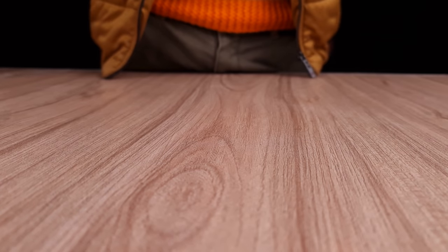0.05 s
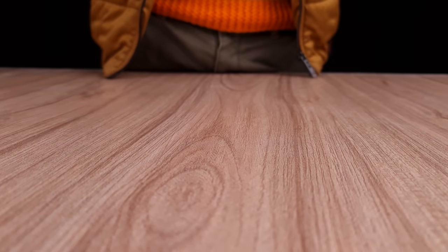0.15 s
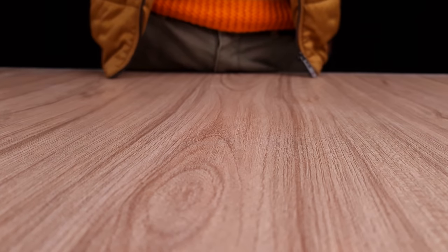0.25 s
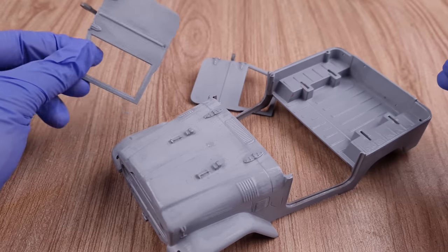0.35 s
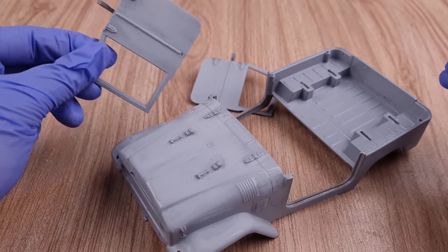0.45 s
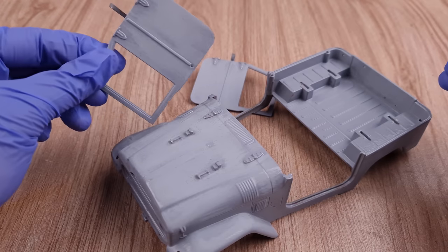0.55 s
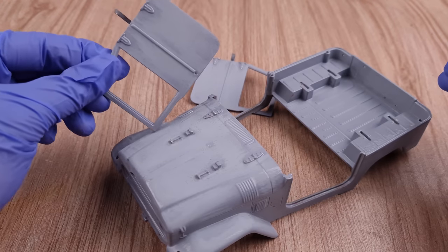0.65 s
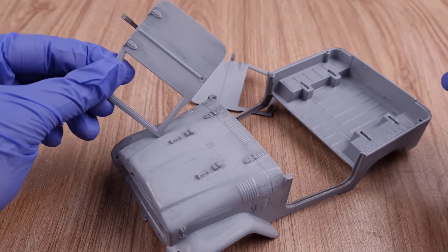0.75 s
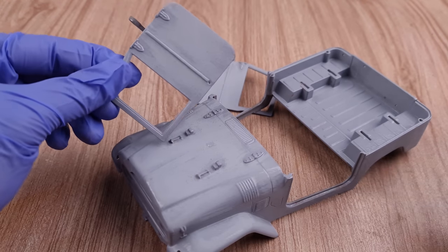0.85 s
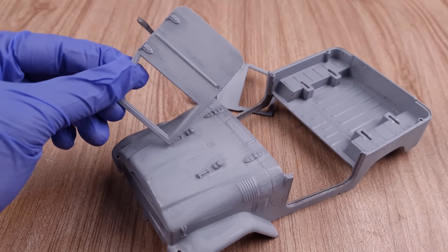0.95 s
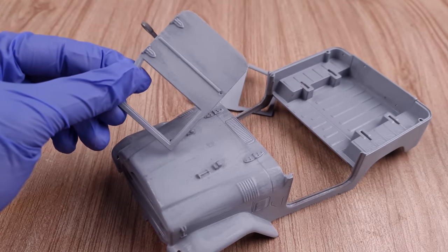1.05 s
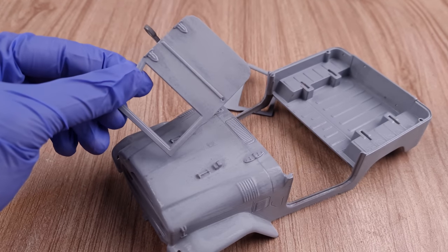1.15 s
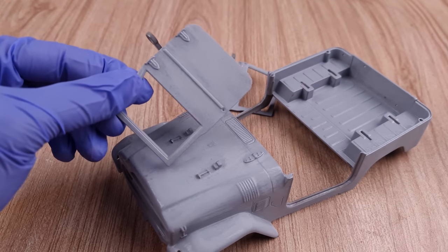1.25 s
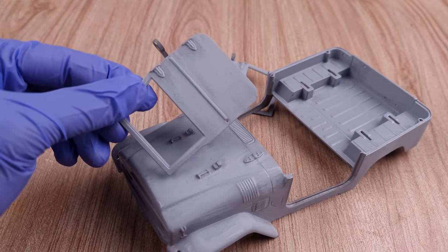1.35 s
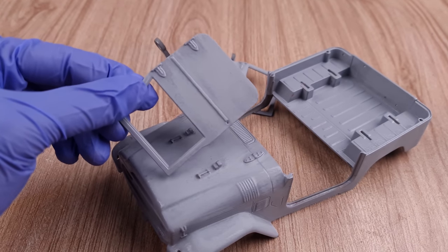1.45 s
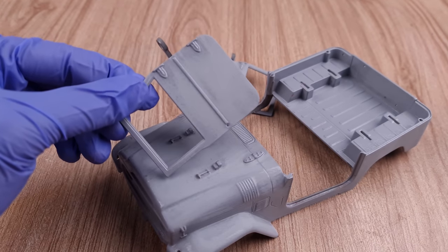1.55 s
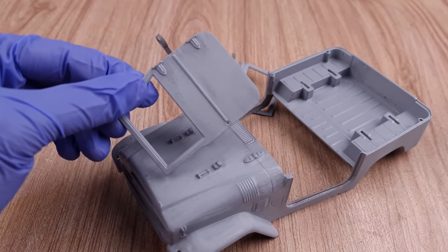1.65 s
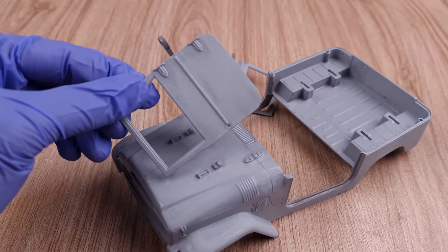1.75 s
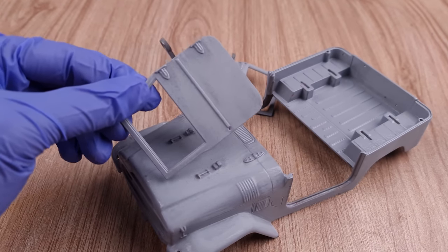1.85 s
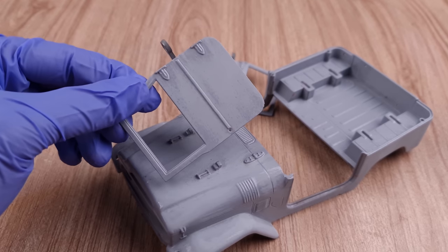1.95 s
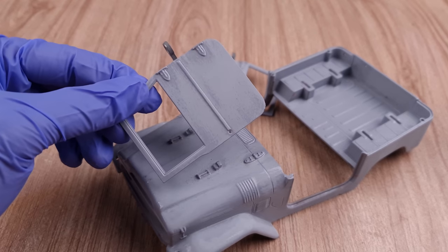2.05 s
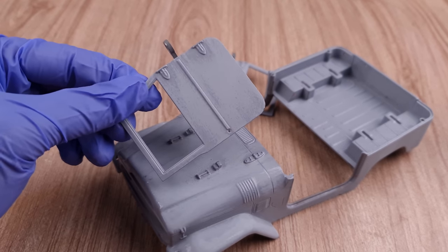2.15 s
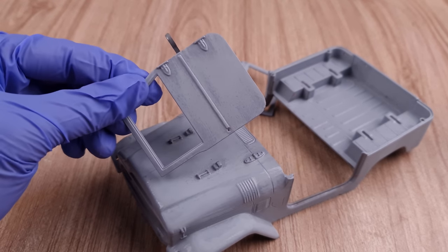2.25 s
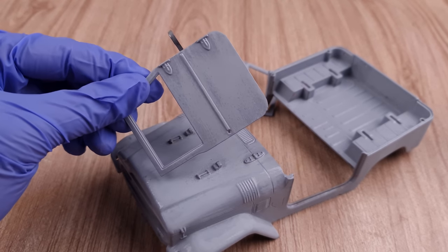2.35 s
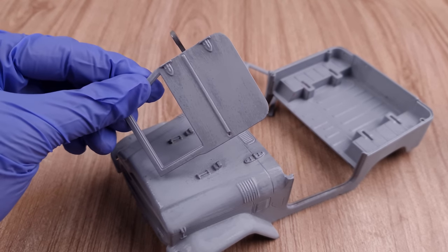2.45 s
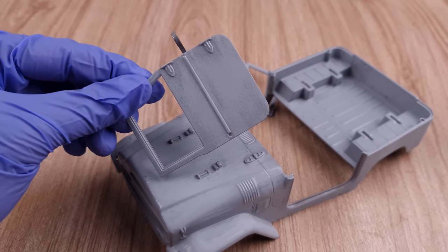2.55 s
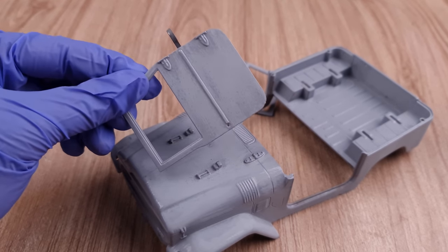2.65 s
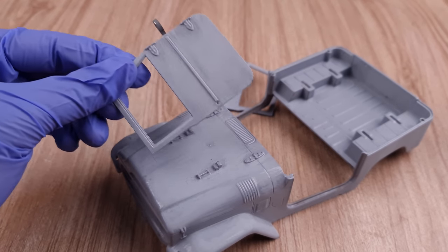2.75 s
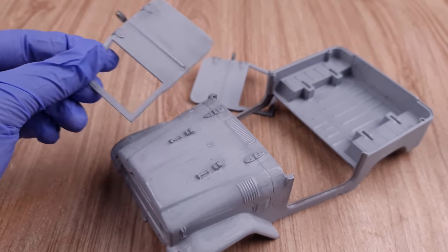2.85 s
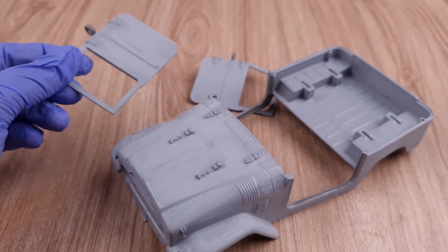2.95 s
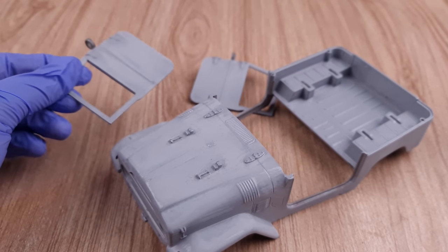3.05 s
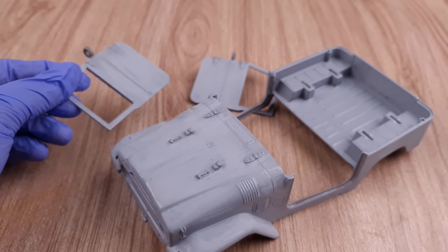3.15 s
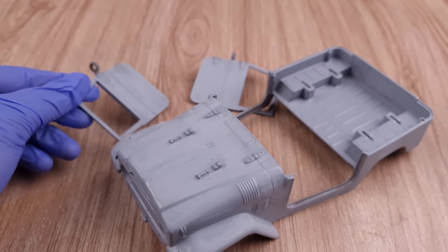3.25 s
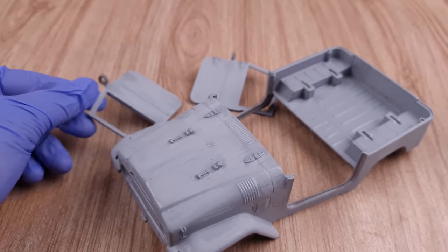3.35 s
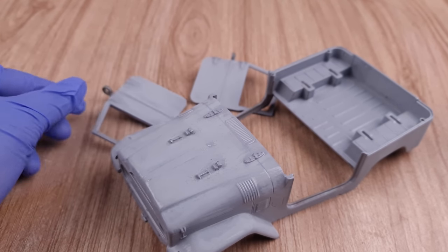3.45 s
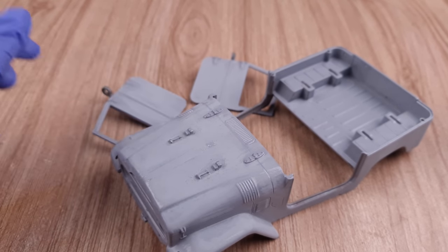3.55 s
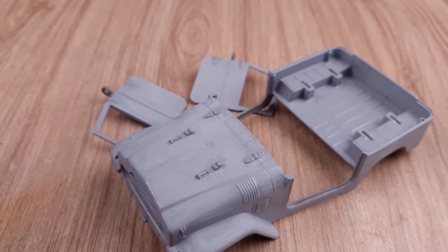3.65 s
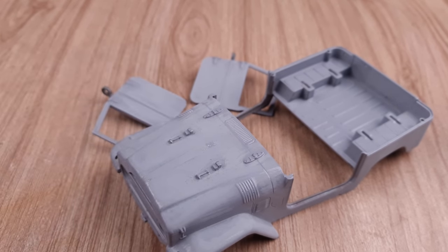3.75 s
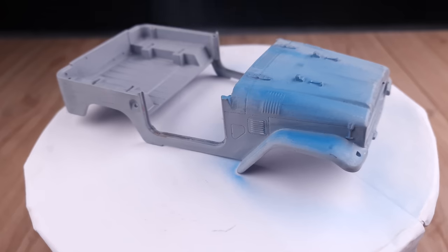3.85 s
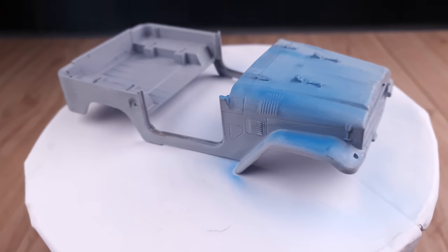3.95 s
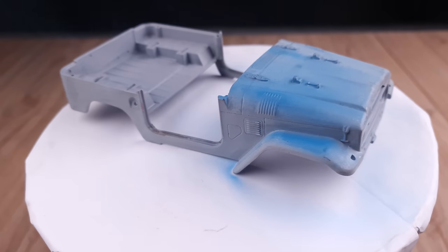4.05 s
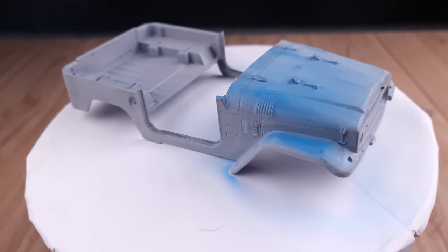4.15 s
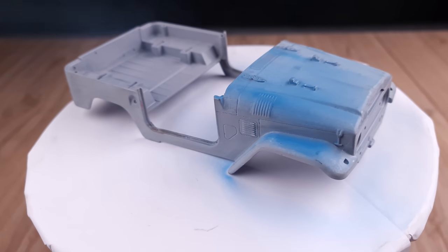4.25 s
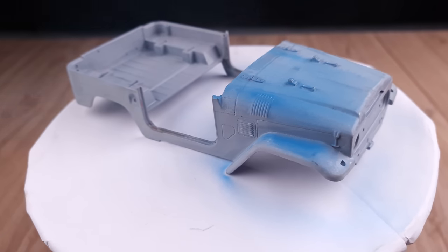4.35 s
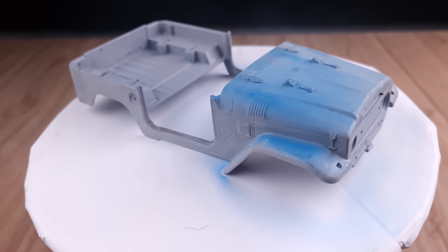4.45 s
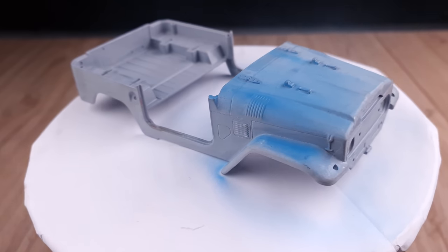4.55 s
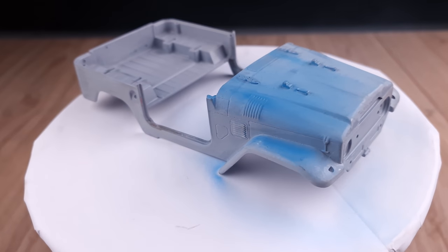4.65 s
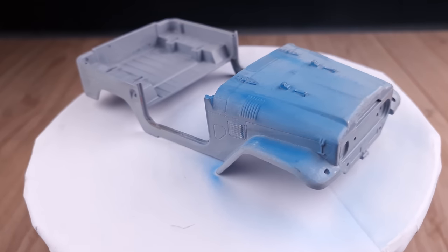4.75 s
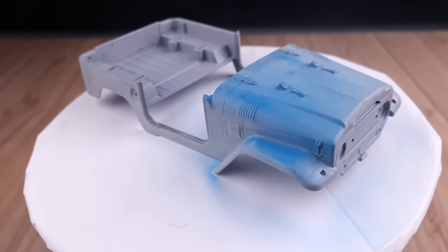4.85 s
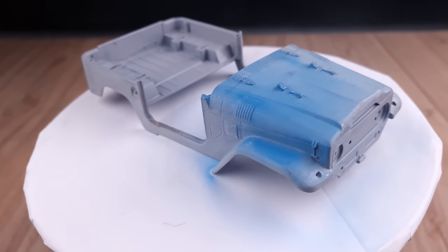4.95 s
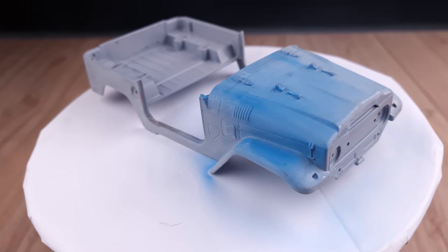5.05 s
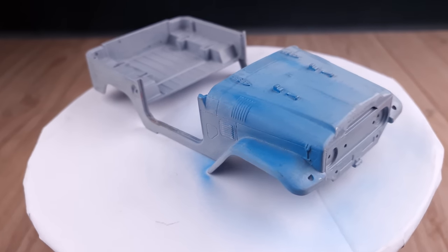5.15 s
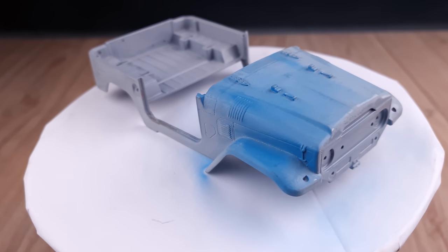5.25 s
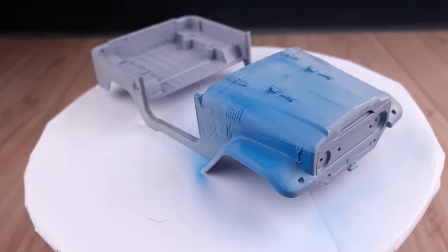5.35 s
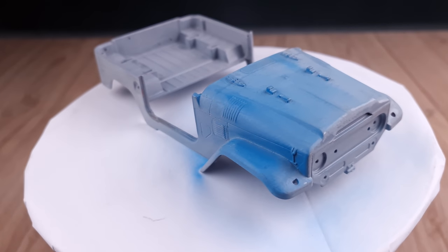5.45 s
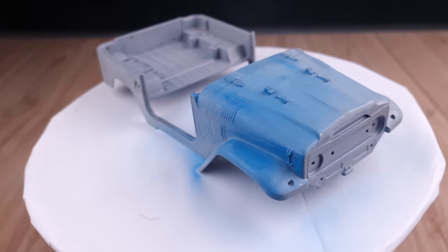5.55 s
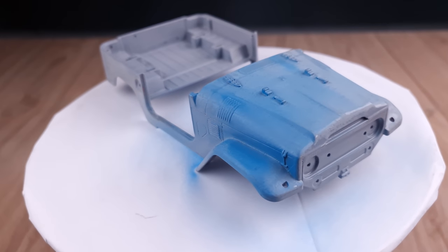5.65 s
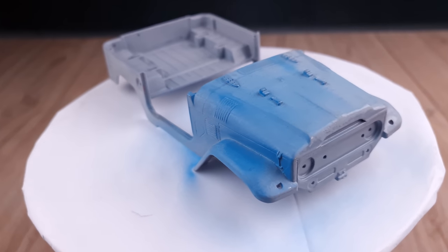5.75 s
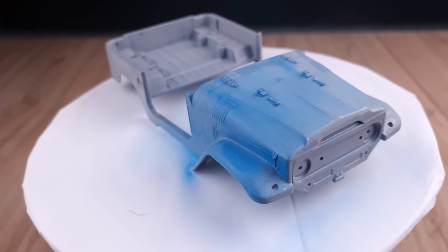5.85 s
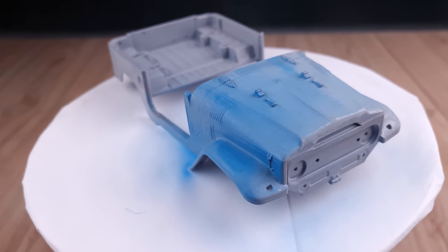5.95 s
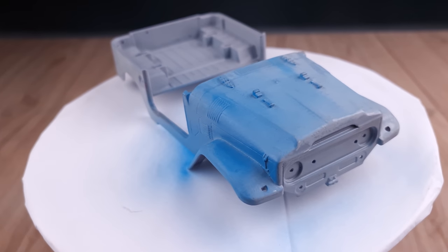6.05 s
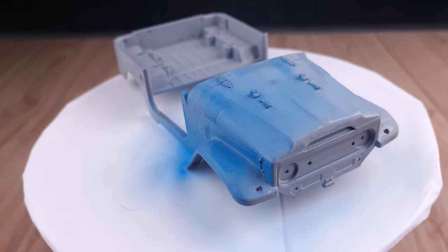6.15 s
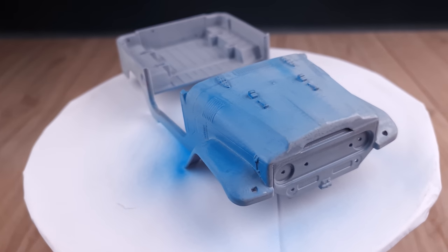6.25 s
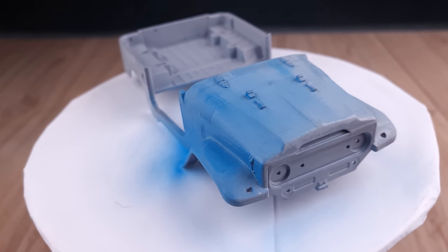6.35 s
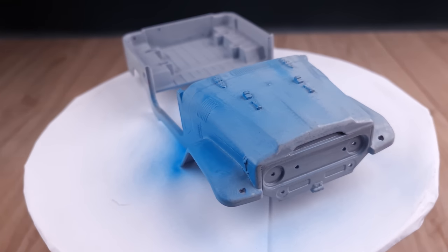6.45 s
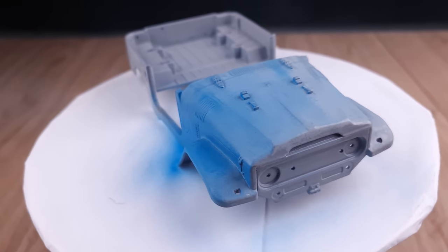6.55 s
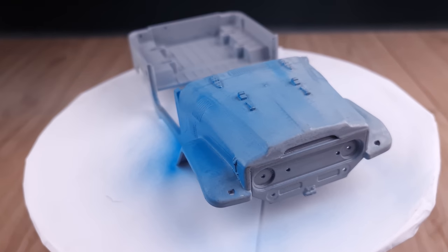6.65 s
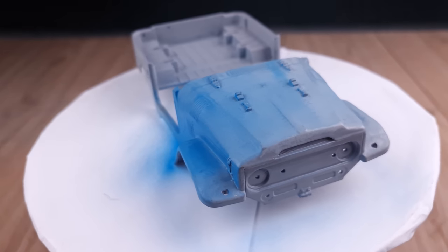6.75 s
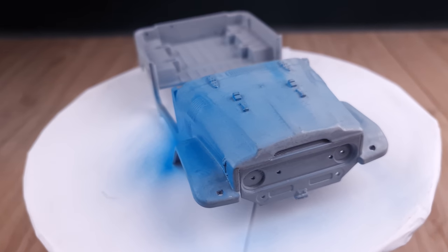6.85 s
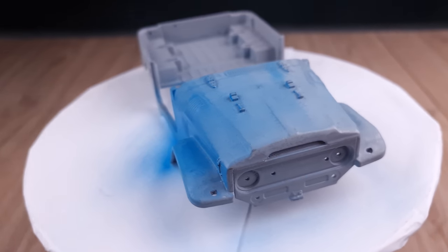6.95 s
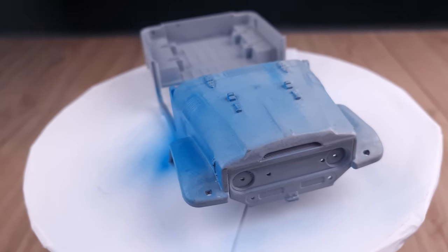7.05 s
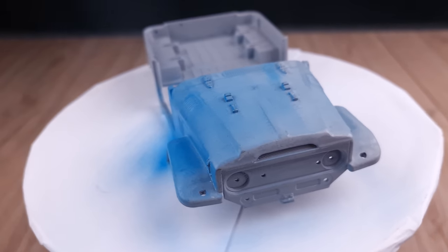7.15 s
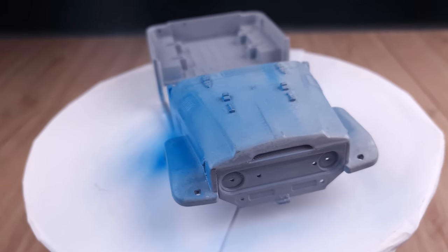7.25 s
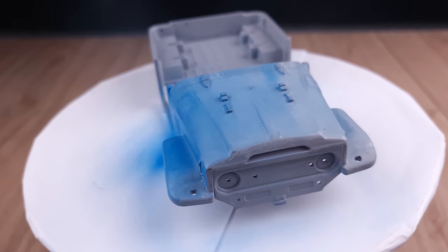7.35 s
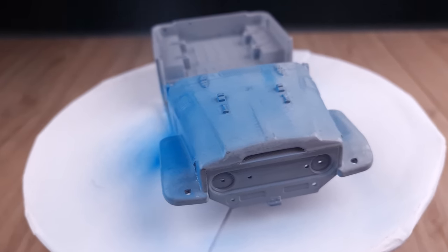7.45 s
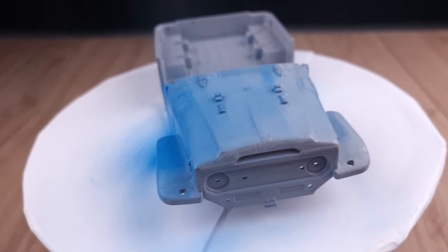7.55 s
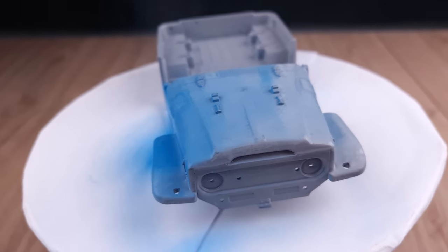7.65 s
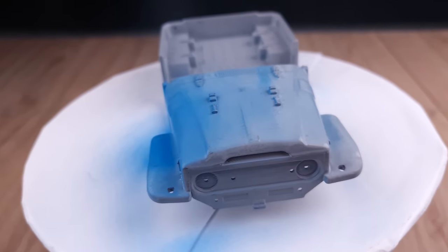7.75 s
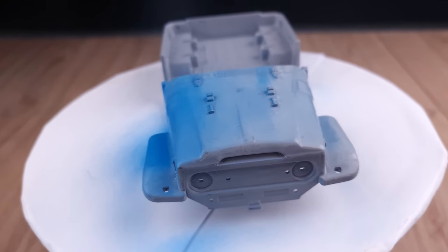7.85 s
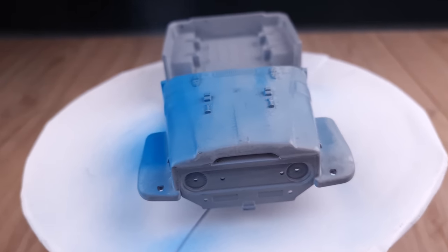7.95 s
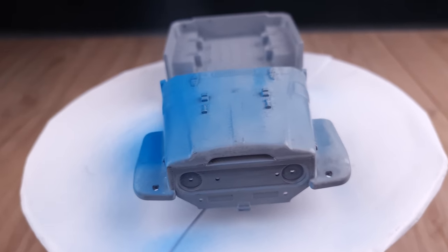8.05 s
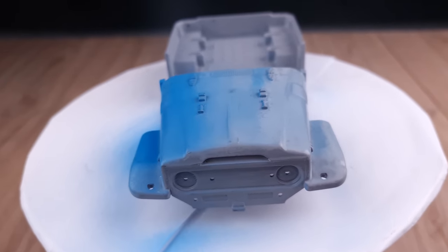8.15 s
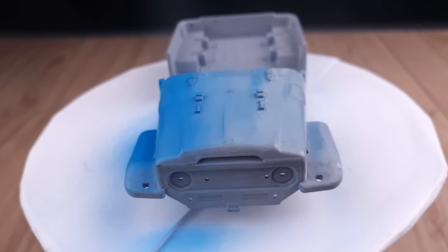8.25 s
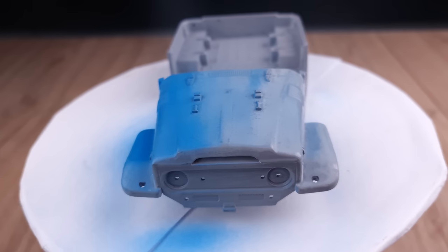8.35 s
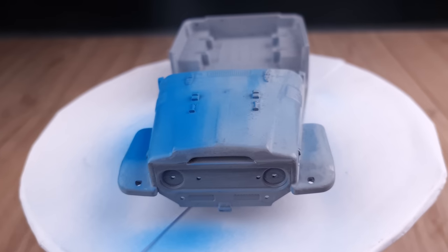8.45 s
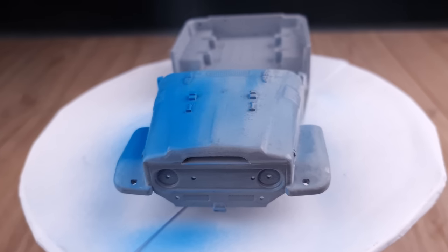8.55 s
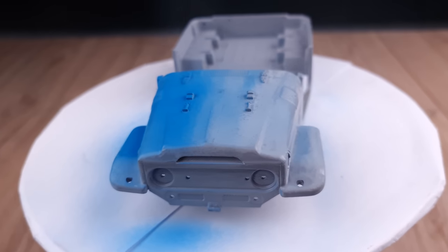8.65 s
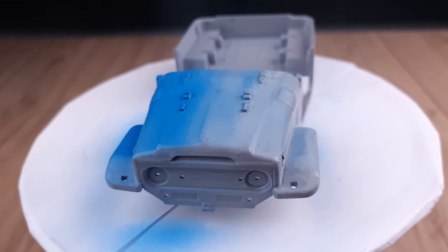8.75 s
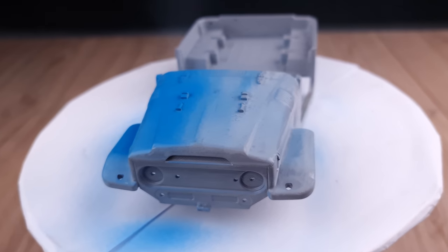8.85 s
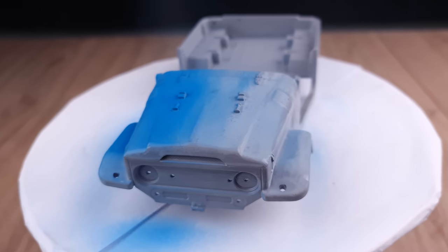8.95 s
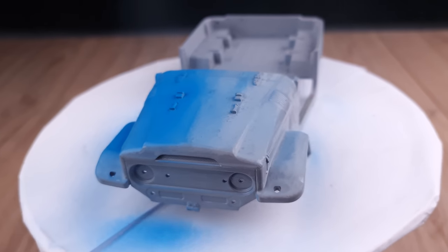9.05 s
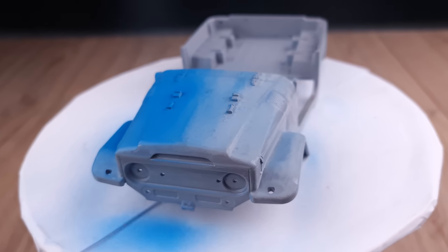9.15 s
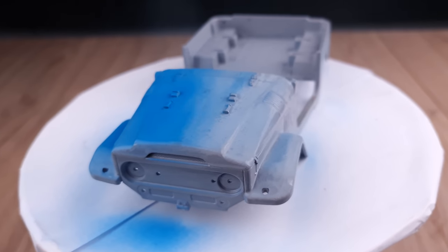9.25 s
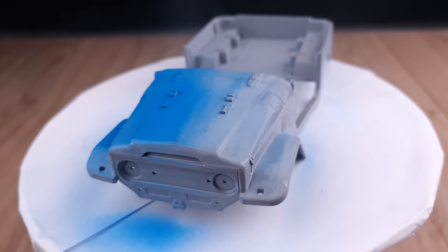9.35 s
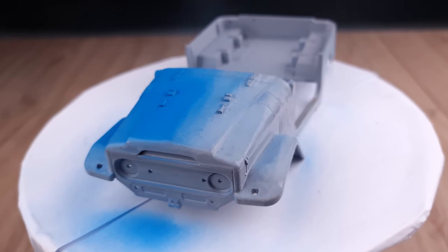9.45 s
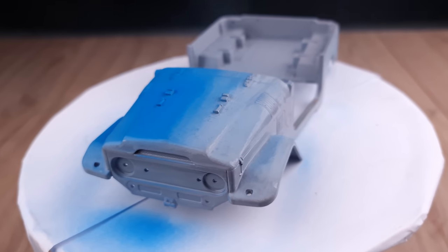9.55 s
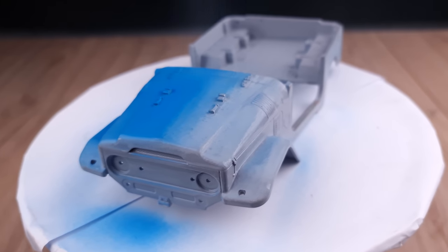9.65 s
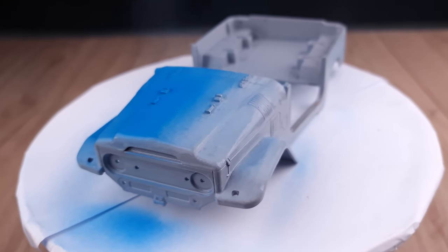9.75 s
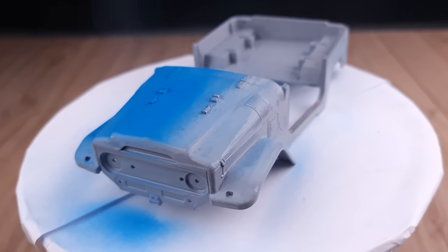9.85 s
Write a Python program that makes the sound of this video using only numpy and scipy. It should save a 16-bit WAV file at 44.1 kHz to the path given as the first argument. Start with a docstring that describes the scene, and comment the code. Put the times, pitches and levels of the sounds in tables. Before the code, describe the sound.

Very close to a wooden workbench, a heap of hard plastic parts scrapes and rattles, then cuts abruptly to near-quiet handling: a sharp double click, soft glove rubs, faint tinks and bumps. A plastic panel drops, slaps and chatters, its small steel pins ringing. Another hard cut brings the steady, bright hiss of an airbrush, slightly shifting in tone, lasting to the end.

```python
"""At a wooden workbench, close to the microphone: three shots joined by hard cuts.
A rattling heap of parts is pushed over the table: gritty noise drives narrow resonances. Gloved hands
turn a plastic panel that clicks (noise bursts) and drop it: its steel pins ring (damped sines) and it rattles.
Last an airbrush hisses: coloured noise, combed by the table echo as the hand moves."""
import sys
import numpy as np
from scipy import signal
from scipy.fft import rfft, irfft, next_fast_len
from scipy.io import wavfile
from scipy.ndimage import map_coordinates

SR = 44100
rng = np.random.default_rng(int(sys.argv[2]) if len(sys.argv) > 2 else 0)


def wav_record(signal):
    """Record a signal, one row per channel, as 16-bit PCM in the file named by sys.argv[1]."""
    frames = np.transpose(np.atleast_2d(signal))
    bounded = np.clip(frames, -1, 1)
    # unit amplitude maps onto the largest positive 16-bit level
    quanta = np.round(bounded * 32767).astype(np.int16)
    wavfile.write(sys.argv[1], SR, quanta)


N = 436149

# wooden table, spectrum shape: f/Hz, density/dB
WOOD_SPECTRUM = [(18, -75), (30, -44.5), (43, -16.5), (92, -30), (111, -10.5), (139, 3.5), (204, -5),
                 (500, -26), (650, -64.5), (1100, -120)]
# room hush, also the dull part of the tinks, spectrum shape: f/Hz, density/dB
HUSH_SPECTRUM = [(240, -37.5), (400, -11), (428, -13.5), (734, -9.5), (1120, -3), (1600, -7), (1900, -17),
                 (4000, -26.5), (5200, -65), (8800, -120)]
# deep bumps and air puffs, spectrum shape: f/Hz, density/dB
DEEP_SPECTRUM = [(30, -41), (50, -7.5), (80, 9), (110, -6), (160, -52)]


def amp(db):
    """Gain of a level in dB."""
    return 10 ** (np.asarray(db) / 20)


def unit(x):
    """x scaled to rms 1."""
    return x / np.sqrt(np.mean(x ** 2) + 1e-20)


def along(points, hz):
    """(f/Hz, value) points interpolated on a log frequency axis."""
    f, v = np.transpose(points)
    return np.interp(np.log(hz + 1), np.log(f + 1), v)


def curves(rows):
    """One value per sample for each column after the time."""
    s, *cols = np.transpose(rows)
    return [np.interp(np.arange(N) / SR, s, c) for c in cols]


def wobble(rate_hz, at=np.arange(N)):
    """Smooth random curve, rate_hz knots a second, read at the given samples."""
    knots = rng.standard_normal(int(N * rate_hz / SR) + 4)
    return map_coordinates(knots, [at * rate_hz / SR])


def filtered(x, response):
    """x times a response of frequency."""
    m = next_fast_len(N + SR // 2)
    return irfft(rfft(x, m) * response(np.fft.rfftfreq(m, 1 / SR)), m)[..., :N]


def noise(spectrum, grit_db=0):
    """Coloured noise of rms 1; grit makes single samples stand out as grains."""
    grains = rng.standard_normal(N) * amp(grit_db * rng.exponential(size=N))
    return unit(filtered(grains, lambda hz: amp(along(spectrum, hz))))


def narrow(hz, width_hz, size):
    """Noise ringing in one resonance, rms 1."""
    pole = np.exp(np.pi * (2j * hz - width_hz) / SR)
    return unit(signal.lfilter([1], [1, -pole], rng.standard_normal(size)).real)


def knock(spectrum, t60_s, corner_hz=12000):
    """Spike and fresh dying burst in the colour of a struck body, peak 1; soft contact cuts the treble."""
    n = 8192
    hz, t = np.fft.rfftfreq(n, 1 / SR), np.arange(n) / SR
    gain = amp(along(spectrum, hz)) / (1 + (hz / corner_hz) ** 2)
    # folded cepstrum: minimum phase, so the body answers at once
    cep = irfft(np.log(gain + 1e-6))
    cep[1:n // 2] *= 2
    cep[n // 2 + 1:] = 0
    body = irfft(np.exp(rfft(cep)))
    blow = rng.standard_normal(n) * amp(-60 * t / t60_s) + 5 * (t == 0)
    burst = signal.fftconvolve(blow, body)[:n]
    return burst / np.abs(burst).max()


def ring(modes, spread_db):
    """Damped modes (f/Hz, level/dB, t60/s), each at a new strength and slightly unsteady in phase."""
    t = np.arange(SR // 2) / SR
    total = 0
    for hz, db, t60_s in modes:
        decay = amp(db + rng.normal(0, spread_db) - 60 * t / t60_s)
        drift_rad = np.cumsum(rng.normal(0, 0.027, len(t)))
        total = total + decay * np.sin(2 * np.pi * hz * t + drift_rad)
    return total


def swells(events, rise, fall):
    """Gain of (t/s, peak/dB[, held/s]) events that rise and fall by so many dB a second; powers add."""
    t = np.arange(0, N / SR, .001)
    s, db, *held_s = np.array(events).T[:, :, None]
    since_end_s = np.maximum(t - s - np.abs(sum(held_s)), 0)
    shape_db = rise * np.minimum(t - s, 0) - fall * since_end_s
    return np.interp(np.arange(N) / SR, t, np.sqrt((amp(db + shape_db) ** 2).sum(axis=0)))


def add(track, s, x):
    """Mixes x into the track from time s."""
    track[round(s * SR):][:len(x)] += x


def spray():
    """Jet hiss and its splash arrive straight, off the table, and weakly off everything nearby."""
    # jet: t/s, level/dB
    jet_levels = [(3.85, -28.5), (4.02, -34), (4.18, -37.5), (4.47, -28.5), (4.79, -24.5), (4.97, -28.5),
                  (5.1, -24.5), (5.26, -27), (5.5, -31.5), (5.75, -29.5), (6.41, -29), (6.61, -30.5),
                  (7.06, -29), (7.33, -30), (7.52, -28), (8.05, -30), (8.35, -29), (8.88, -31), (9.6, -29),
                  (9.89, -31.5)]
    # table echo: t/s, mean delay/ms, strength/0-1
    table_echo = [(3.85, .13, 0.6), (4.1, 0.14, 0.4), (4.3, 0.12, 0.4), (4.5, .095, 0.72), (5, 0.09, 0.9),
                  (5.4, 0.092, 0.6), (5.8, 0.092, 0.5), (6.2, 0.095, 0.8), (6.6, .103, 0.6), (7, .112, 0.5),
                  (7.2, 0.14, 0.7), (7.6, .13, 0.6), (8, 0.14, 0.7), (8.4, 0.13, 0.6), (8.8, 0.14, 0.6),
                  (9.2, 0.13, 0.6), (9.6, 0.14, 0.6), (9.89, .13, .45)]
    # echoes off hand, part and stand: base delay/ms, relative strength/0-1
    nearby = [(.33, 0.04), (.5, 0.25), (.72, 0.27), (.9, 0.05), (1.1, 0), (1.3, 0.03), (1.5, 0.07),
              (1.9, 0.13), (2.2, 0.05), (2.5, 0.06), (2.85, 0.14), (3.151, 0.1), (3.8, .05), (4.25, .06)]
    # jet, spectrum shape: f/Hz, density/dB
    jet_spectrum = [(1500, -23), (3000, -12), (5000, -3.5), (8000, 2), (12000, -1.5), (16000, 0)]
    # splash on the part, brush held low and held high, spectrum shapes: f/Hz, density/dB
    splash_spectra = [(120, -21), (200, -18), (347, -12.5), (486, -15.5), (535, -12), (834, -5.5),
                      (980, -5.5), (1300, -6.5), (1370, -5.5), (1630, -4), (2480, 1.5), (3480, -3),
                      (3820, -0.5), (4490, -5.5), (5000, -8), (6500, -40), (11000, -120)], [(120, -43),
                      (200, -19.5), (382, -19), (474, -64), (542, -17.5), (967, -5.5), (1550, -8),
                      (1750, -2.5), (2080, -1), (2320, -4), (2760, 2), (2960, -4.5), (3210, 1.5),
                      (3720, -4.5), (5000, -10.5), (6500, -57), (11000, -120)]
    # draught, spectrum shape: f/Hz, density/dB
    draught_spectrum = [(15, -51), (25, -53), (55, -17), (75, 4), (124, -19.5), (193, 4.5), (400, -9),
                        (520, -63), (880, -120)]
    # air puffs on the microphone: t/s, peak/dB
    puffs = [(3.9, -51), (4.5, -60), (4.8, -47), (5.13, -46), (5.36, -52.5), (5.9, -57), (6.5, -49),
             (7.0, -49), (7.1, -42), (7.6, -50.5), (8.33, -58), (9.15, -59)]
    # paint flow stutters: t/s, peak/dB
    spits = [(4.22, -40.5), (4.38, -39), (7.1, -39.5)]
    # stutter, spectrum shape: f/Hz, density/dB
    spit_spectrum = [(120, -30), (250, -6), (600, -3), (1200, -1), (2000, -20), (4000, -65)]
    usual_jet_db, nearby_db = -30.5, -2
    raised_s, raising_s = 7.15, 0.28  # brush lifted away from the table: middle, duration
    jet_spread = 0.047  # long jet: its near and far ends echo this fraction sooner and later

    jet_db, = curves(jet_levels)
    swing_db = jet_db - usual_jet_db
    table_ms, strength = curves(table_echo)
    high = np.clip((np.arange(N) / SR - raised_s) / raising_s + .5, 0, 1)
    splash = np.sqrt(1 - high) * noise(splash_spectra[0]) + np.sqrt(high) * noise(splash_spectra[1])
    splash_db = -38.5 + 0.31 * swing_db  # swings less than the jet
    air = amp(jet_db + 0.54 * wobble(14)) * noise(jet_spectrum, grit_db=2.14)
    air = air + amp(splash_db + 0.76 * wobble(16)) * splash

    hz, t, z = signal.stft(air, SR, nperseg=1024)
    at = np.minimum((t * SR).astype(int), N - 1)

    def echo(ms):
        return np.exp(-2j * np.pi * hz[:, None] * ms / 1000)

    table_gain = strength[at] / (1 + (hz[:, None] / 13000) ** 2)
    table = [table_gain * echo(table_ms[at] * (1 + end * jet_spread)) for end in (-1, 1)]
    paths = 1
    for ms, size in nearby:  # each path swells and drifts as the hand sways and the stand turns
        gain = amp(nearby_db) * size * np.tanh(2 * wobble(3, at))
        paths = paths + gain * echo(ms + 0.57 * table_ms[at] + 0.024 * wobble(1.4, at))
    comb = np.sqrt(sum(np.abs(paths + end) ** 2 for end in table) / 2)  # power mean of both jet ends
    air = signal.istft(z * comb, SR, nperseg=1024)[1][:N]

    air = air + swells(spits, rise=370, fall=280) * noise(spit_spectrum)
    draught_db = -60.5 + 1.4 * swing_db + 2.6 * wobble(4.5)
    draught = amp(draught_db) * noise(draught_spectrum)
    return air + amp(-8.5) * room(air) + draught + swells(puffs, rise=160, fall=210) * noise(DEEP_SPECTRUM)


def push():
    """Scraping grains shake the board and ring the loose parts, whose levels wander."""
    # board: t/s, level/dB, bright part above it/dB
    board = [(0.0, -23, 2), (0.03, -25, 3), (0.042, -22.5, 1), (0.174, -27.5, 1.5), (0.19, -21.5, -4.5),
             (0.236, -25.5, -2), (0.324, -20, -16), (0.348, -29.5, -12)]
    # ringing parts: f/Hz, width/Hz, relative level/dB
    heap = [(336, 26, -3), (627, 17, 3), (887, 29, -2.5), (2050, 47, 3), (2400, 23, -3.5), (3590, 34, -4),
            (4050, 27, -4), (4600, 68, -22.5), (4750, 21, -17.5), (5080, 34, -12), (5470, 35.5, -20),
            (5440, 27, -10), (5820, 32, -16), (6283, 42, -15.5), (6750, 75, -17.5), (7240, 32, -16),
            (7835, 33, -21), (8090, 34, -42.5), (9800, 42, -29.5), (11700, 34, -27.5), (13000, 40, -39),
            (14770, 81, -33), (15430, 98, -27)]
    # part that rings out late: f/Hz, width/Hz, relative level/dB
    late_part = (3054, 14, -1.2)
    # scrape, spectrum shape: f/Hz, density/dB
    drag_spectrum = [(35, -51.5), (60, -14.5), (329, 3), (604, -3), (1370, -8), (2080, -7), (2620, -10),
                     (3090, -17.5), (3390, -16), (3640, -19), (4590, -28.5), (5400, -28), (15800, -44.5)]
    late_s = .21

    board_db, bright_db = curves(board)
    at = np.arange(SR // 2)
    drag = noise(drag_spectrum, grit_db=2.5)[at]
    for hz, width_hz, db in heap:
        drag = drag + amp(db - 9.0 + 3.1 * wobble(18, at)) * narrow(hz, width_hz, len(at))
    hz, width_hz, db = late_part
    onset = np.clip((at / SR - late_s) / .04, .1, 1)  # 20 dB weaker at first
    drag = drag + amp(db) * onset * narrow(hz, width_hz, len(at))
    low = filtered(drag, lambda hz: 1 / (1 + (hz / 1350) ** 4))[at]

    def whole(x):
        return np.pad(unit(x), (0, N - len(at)))

    return amp(board_db) * whole(low) + amp(board_db + bright_db) * whole(drag - low)


def drop():
    """Every contact slaps the table and rings both pins; fast chatter fills the gaps."""
    # contacts: t/s, peak/dB, hardness corner/Hz, near pin/dB, far pin/dB (pins relative to the peak)
    contacts = [(3.2756, -2, 3430, -8, -30), (3.2845, -14, 3970, -9.5, -28.5),
                (3.4229, -2, 2160, -13, -38.5), (3.4423, -4.5, 3023, -14, 1.5),
                (3.4558, -14, 3000, -11.5, -0.5), (3.4648, -16, 4030, -12, -11),
                (3.481, -6, 4053, -3.5, -19.5), (3.488, -12.5, 2996, -7, -11),
                (3.499, -21, 3020, -15.5, -11.5), (3.513, -9.5, 4080, -6.5, -6),
                (3.544, -11, 3980, -6.5, -9), (3.555, -21.5, 4000, -2, -4.5),
                (3.565, -22, 4020, -5.5, -11.5)]
    # steel pin modes: f/Hz, relative level/dB, t60/s, pin (0 near, 1 far)
    pins = [(4180, -18, 0.069, 0), (5630, -19, 0.17, 0), (6810, -20.5, 0.19, 0), (9330, -20, 0.091, 0),
            (11640, -29, 0.13, 0), (12600, -40, .14, 0), (2360, -29, .1, 1), (3260, -18, 0.19, 1),
            (4510, -11, 0.068, 1), (4547, -26, 0.45, 1), (5450, -26, 0.21, 1), (6270, -22, 0.19, 1),
            (7710, -26, 0.16, 1), (8160, -36.5, .24, 1), (11100, -26, .09, 1), (11100, -19, 0.12, 1),
            (14260, -31, .1, 1)]
    # plastic on wood, spectrum shape: f/Hz, density/dB
    slap_spectrum = [(40, -38), (90, -8.5), (151, -3), (270, -10), (360, -1.5), (900, -3.5), (1140, -3),
                     (2000, -0.5), (4500, -1.5), (8000, -11.5), (15800, -16.5)]
    # panel chatters to rest: t/s, level before low-pass/dB
    rattle = [(3.43, -130), (3.445, -29), (3.55, -27), (3.6, -44.5), (3.65, -130)]

    out = np.zeros(N)
    for s, db, corner_hz, *pin_db in contacts:
        add(out, s, amp(db) * knock(slap_spectrum, 0.037, corner_hz))
        modes = [(hz, level + pin_db[int(pin > .5)], t60_s) for hz, level, t60_s, pin in pins]
        add(out, s, amp(db) * ring(modes, spread_db=1.6))
    chatter = filtered(noise(slap_spectrum, grit_db=2.5), lambda hz: 1 / (1 + (hz / 4000) ** 2))
    return out + amp(curves(rattle)[0] + 3.7 * wobble(120)) * chatter


def clicks():
    """Dry plastic clicks, each with a dull thump of the table, and two small tinks of damped modes."""
    # panel clicks: t/s, peak/dB, thump above it/dB, hardness corner/Hz
    panel_clicks = [(0.457, -53.5, -1, 2500), (0.9118, -10, -31, 12000), (0.9307, -12.5, -17, 12000),
                    (0.953, -41, -4, 12000), (0.972, -42, -5, 12000), (1.418, -39, -20.5, 2500),
                    (2.3524, -65.5, -12, 8000), (2.4074, -61, -16, 5000)]
    # plastic panel, spectrum shape: f/Hz, density/dB
    panel_spectrum = [(350, -42.5), (600, -12.5), (1820, -5), (2230, 0), (4550, 2), (6580, -1.5),
                      (9140, -6.5), (10500, -17.5), (12900, -14.5), (15800, -36)]
    # something small nudged, sharply then softly: t/s, level/dB, tilt/(dB/octave)
    tinks = [(0.707, -50, 4), (0.776, -44, -8.5)]
    # its modes: f/Hz, relative level/dB, t60/s
    small_modes = [(680, -3.5, .07), (1350, -11, .06), (1865, -9.5, 0.06), (3390, -30, 0.17),
                   (4899, -25.5, 0.1), (5400, -27, .08), (6380, -25.5, 0.16), (7558, -32.5, .1),
                   (8210, -34, .12)]

    out = np.zeros(N)
    for s, db, thump_db, corner_hz in panel_clicks:
        add(out, s, amp(db) * knock(panel_spectrum, 0.016, corner_hz))
        add(out, s + 0.0033, amp(db + thump_db) * knock(WOOD_SPECTRUM, 0.11))
    lowest_hz = small_modes[0][0]
    for s, db, tilt_db in tinks:
        modes = [(hz, level + tilt_db * np.log2(hz / lowest_hz), t60_s) for hz, level, t60_s in small_modes]
        add(out, s, amp(db) * ring(modes, spread_db=3.8))
        add(out, s, amp(db - 12.5) * knock(HUSH_SPECTRUM, 0.083))
    return out


def hands():
    """Swelling noises of glove rub, click tail, sleeve rumble and deep bumps, over hush, hum and whine."""
    # glove slides on plastic, and the broad tail of the clicks (.97):
    # t/s, peak/dB, held/s, dull part above it/dB
    strokes = [(.85, -49.5, 0, -3), (.97, -67, 0.17, 6), (1.3, -64, .01, -19), (1.34, -73, .1, -12),
               (2.36, -74, 0, -1), (2.4, -81, 0.0037, 4), (2.8, -86.5, .01, -6), (3.2, -65.5, 0.021, 0)]
    # glove, spectrum shape: f/Hz, density/dB
    glove_spectrum = [(880, -40.5), (1500, -1), (2380, -3.5), (3110, -6.5), (5290, -0.5), (8090, -4),
                      (12100, -11), (15800, -22)]
    # sleeves drag on the table: t/s, peak/dB
    rumbles = [(.42, -57.5), (.74, -51), (.94, -37.5), (1.22, -70), (1.4, -57.5), (1.55, -61.5),
               (1.77, -61.5), (2.08, -70.5), (2.3, -76), (2.43, -81.5), (3.1, -82)]
    # deep bumps, those from 3.31 to 3.55 being the low thud of the dropped panel: t/s, peak/dB
    bump_events = [(.5, -68), (.84, -63), (.95, -39), (1.12, -52), (1.4, -80.5), (1.58, -82.5), (2.08, -79),
                   (2.34, -75), (2.87, -57), (3.05, -62.5), (3.11, -63), (3.31, -48), (3.44, -43.5),
                   (3.55, -50), (3.72, -61)]
    # room hush: t/s, level/dB
    hush_levels = [(.36, -71), (.9, -65), (1.3, -73), (2, -81.5), (3.2, -83)]
    # faint hum that stops: t/s, level/dB
    hum_levels = [(.36, -68), (1.3, -71.5), (2.25, -74.5), (2.45, -120)]
    # faint tones: f/Hz, mean level/dB
    whine_tones = [(645, -89), (861, -86), (5180, -92), (10400, -92)]
    # microphone self-noise, spectrum shape: f/Hz, density/dB
    fizz_spectrum = [(3500, -45.5), (5200, -1.5), (8000, 0.5), (11000, 1), (13000, -3), (16000, -13.5)]
    hum_hz, hum_width_hz = 205, 14

    t = np.arange(N) / SR
    whine = 0
    for hz, db in whine_tones:
        whine = whine + amp(db + 2 * wobble(20)) * np.sin(2 * np.pi * hz * t + 1.2 * wobble(60))

    glove = amp(1.7 * wobble(30)) * noise(glove_spectrum)
    dull = filtered(glove, lambda hz: 1 / (1 + (hz / 4000) ** 4))
    dull_strokes = [(s, db + dull_db, held_s) for s, db, held_s, dull_db in strokes]
    rub = swells([row[:3] for row in strokes], rise=400, fall=200) * (glove - dull)
    rub = rub + swells(dull_strokes, rise=400, fall=200) * dull

    rumble = swells(rumbles, rise=380, fall=140) * amp(3.15 * wobble(22)) * noise(WOOD_SPECTRUM)
    bumps = swells(bump_events, rise=350, fall=300) * noise(DEEP_SPECTRUM)
    hum = unit(filtered(rng.standard_normal(N), lambda f: 1 / (1 + (2 * (f - hum_hz) / hum_width_hz) ** 2)))
    hum = amp(curves(hum_levels)[0]) * hum
    hush = amp(curves(hush_levels)[0] + 1.8 * wobble(12)) * noise(HUSH_SPECTRUM)
    return rub + hush + rumble + bumps + hum + whine + amp(-82.0) * noise(fizz_spectrum)


def room(x):
    """Reverberation: a noise tail in which each frequency dies at its own speed."""
    # room decay: f/Hz, t60/s
    decay = [(100, 0.97), (300, 0.4), (1000, 0.37), (3000, 0.39), (8000, 0.27), (15000, 0.18)]
    hz, t, z = signal.stft(rng.standard_normal(SR), SR, nperseg=256)
    tail = signal.istft(z * amp(-60 * t / along(decay, hz)[:, None]), SR, nperseg=256)[1]
    late = np.pad(x, (150, 0))  # samples of delay
    return signal.fftconvolve(late, tail / np.linalg.norm(tail))[:N]


def scene():
    """Three shots joined by hard cuts, the same in both channels."""
    # cuts: t/s
    cuts = [.348, 3.847]
    ticks, fall = clicks(), drop()
    bench = hands() + ticks + amp(-10) * room(ticks) + fall + amp(-7.0) * room(fall)
    t = np.arange(N) / SR
    first, second = (np.clip((t - s) / .002 + .5, 0, 1) for s in cuts)
    mix = push() * (1 - first) + bench * (first - second) + spray() * second
    return np.tile(mix, (2, 1))


def record(dry):
    """Band limit: a cosine-squared slope over the last 200 Hz, nothing above."""
    top_hz = 15900
    return filtered(dry, lambda hz: np.cos(np.pi / 2 * np.clip((hz - top_hz) / 200 + 1, 0, 1)) ** 2)


dry = scene()
out = record(dry)
wav_record(out)
```